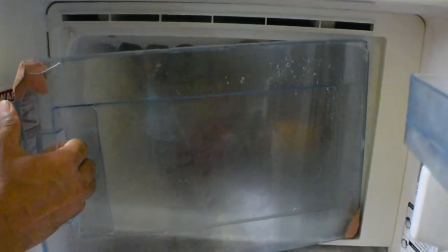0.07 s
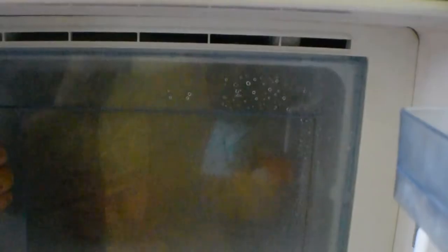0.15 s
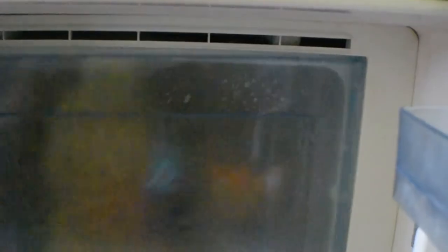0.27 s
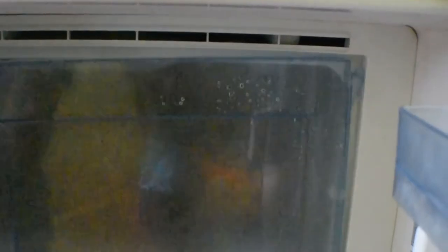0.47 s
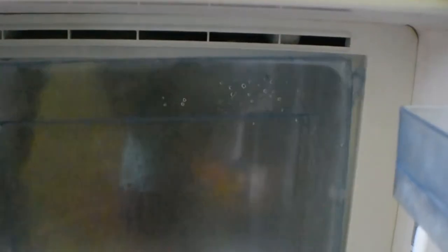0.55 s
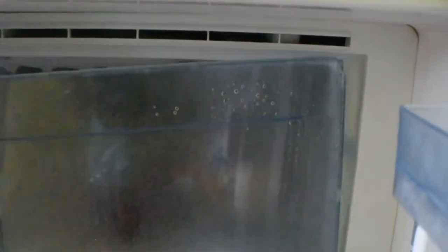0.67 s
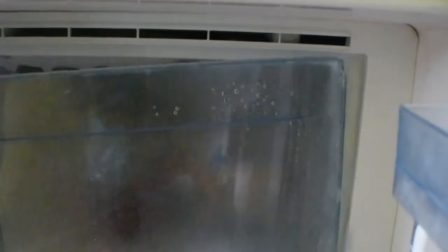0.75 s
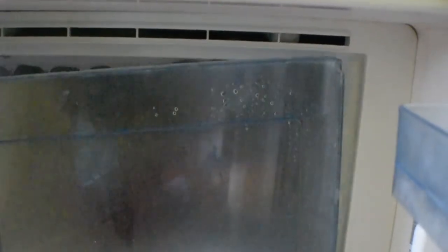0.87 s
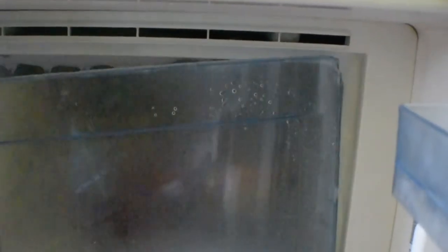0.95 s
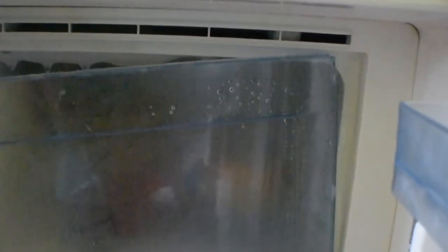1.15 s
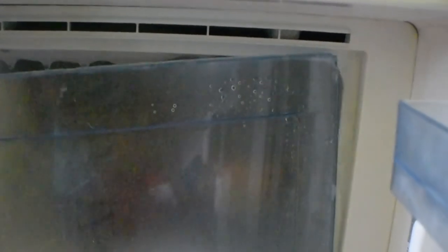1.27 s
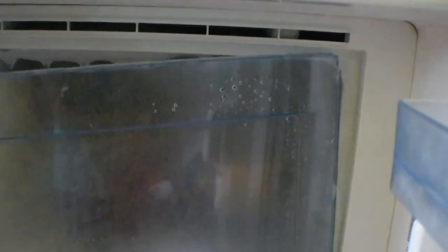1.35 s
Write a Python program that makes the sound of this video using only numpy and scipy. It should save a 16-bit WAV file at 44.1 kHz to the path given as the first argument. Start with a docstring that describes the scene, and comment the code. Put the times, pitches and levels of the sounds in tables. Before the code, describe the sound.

A plastic freezer door slams and rattles, then clicks and gives a bright ping.

```python
"""Freezer door slam and latch.

A spring ping's tail fades under a rubbing noise. A clear plastic freezer door slams against its frame and
chatters, then clicks as it is eased open. The latch snaps free and the hinge gives a bright ping,
probably from its spring. The cabinet and a small kitchen ring on over a faint steady rush; the slam
overloads the close microphone.
"""
import sys
import numpy as np
from scipy import signal
from scipy.fft import rfft, irfft
from scipy.io import wavfile

SR = 44100
rng = np.random.default_rng(int(sys.argv[2]) if len(sys.argv) > 2 else 0)


def write(x):
    x = np.atleast_2d(x).T
    wavfile.write(sys.argv[1], SR, np.round(np.clip(x, -1, 1) * 32767).astype(np.int16))


N = 61739
TIME_S = np.arange(N) / SR
BIN_HZ = np.maximum(np.fft.rfftfreq(N, 1 / SR), 1)
DOOR_LEFT_DB = 0.6


def amp(db):
    """Decibels to gain."""
    return 10 ** (np.asarray(db) / 20)


def curve(points, hz):
    """Interpolate (f/Hz, value) points over log frequency."""
    points_hz, values = np.array(points, float).T
    return np.interp(np.log(hz), np.log(points_hz), values)


def pan(x, left_db):
    """Set the left channel left_db above the right."""
    return x * amp(np.array([[left_db], [-left_db]]) / 2)


def decay(start_s, t60_s, rise_s=0.00041):
    """Envelope: quick rise, exponential fall."""
    age_s = np.maximum(TIME_S - start_s, 0)
    return (1 - np.exp(-age_s / rise_s)) * np.exp(-np.log(1000) * age_s / t60_s)


def ring(start_s, modes, rise_s):
    """Damped sine modes, struck together."""
    age_s = TIME_S - start_s
    return sum(amp(db) * np.sin(2 * np.pi * hz * age_s) * decay(start_s, t60_s, rise_s)
               for hz, db, t60_s in modes)


# Stereo width: f/Hz, side re mid/dB
STEREO_WIDTH = [(150, -44), (1000, -20), (2500, -12.5), (8000, -9), (13000, -4.5)]

def noise(bin_gain):
    """Shaped stereo noise, near mono in the bass."""
    mid, side = rfft(rng.standard_normal((2, N)))
    side = side * amp(curve(STEREO_WIDTH, BIN_HZ))
    return irfft(np.array([mid + side, mid - side]) * bin_gain, N)


def octave_noise(db):
    """Noise of a given level per octave."""
    return noise(amp(db) * np.sqrt(SR / 2 / BIN_HZ / np.log(2)))


def narrow_noise(centre_hz, half_width_hz):
    """Noise in one resonance: a wavering tone, unit RMS."""
    tone = noise(1 / (1 + ((BIN_HZ - centre_hz) / half_width_hz) ** 2))
    return tone / tone.std()


# Kitchen background: f/Hz, octave level/dB
RUSH_SPECTRUM = [(25, -92), (70, -74), (130, -67.5), (280, -60.5), (550, -43.5), (800, -47.5),
                 (1150, -48.5), (1700, -54), (4000, -61), (10500, -66), (12000, -78), (16000, -87)]

def kitchen_rush():
    """Faint steady room noise."""
    return octave_noise(curve(RUSH_SPECTRUM, BIN_HZ))


# Rubbing noise: f/Hz, octave level/dB
RUB_SPECTRUM = [(60, -55), (250, -61), (550, -39.5), (1100, -38.5), (2200, -44.5), (5000, -47.5),
                (9500, -52), (11500, -64), (15500, -66)]
# Fading spring resonances: f/Hz, half-width/Hz, level/dB
SPRING_TAIL = [(3152, 28, -45), (8300, 130, -44), (9820, 39, -56)]

def rub_and_ping_tail(end_s=0.148, release_s=0.0036, split_hz=2000, dull_db_per_s=-34, bright_db_per_s=-73):
    """An earlier spring ping fades under a rubbing noise, treble first, then cuts off abruptly."""
    rub_db = curve(RUB_SPECTRUM, BIN_HZ)
    treble_share = BIN_HZ ** 2 / (BIN_HZ ** 2 + split_hz ** 2)
    dull = octave_noise(rub_db + 10 * np.log10(1 - treble_share))
    bright = octave_noise(rub_db + 10 * np.log10(treble_share))
    bright += sum(amp(db) * narrow_noise(hz, half_width_hz) for hz, half_width_hz, db in SPRING_TAIL)
    gate = np.clip((end_s - TIME_S) / release_s + 1, 0, 1)
    return gate * (dull * amp(dull_db_per_s * TIME_S) + bright * amp(bright_db_per_s * TIME_S))


# Door-frame contacts: t/s, bass/dB, mid/dB, treble/dB, top/dB, t60/s
CONTACTS = [(0.214, -66, -43, -47, -29.5, 0.038), (0.2202, -36, -26, -27.5, -49, 0.086),
            (0.2319, -27, -14, -15, -24.5, 0.072), (0.243, -30, -5.5, -33, -30, 0.04),
            (.2510, -15.5, 0, -16, -13.5, 0.034), (0.255, -9.5, -12, -10.5, -18, 0.038),
            (.2630, -13, -3.5, -6.5, -23, 0.028), (.2790, -20.5, -6, -54, -44, 0.046),
            (.3115, -42, -24, -41, -22.5, 0.024), (0.325, -53, -18, -36, -55, 0.039),
            (.3855, -49, -25, -23, -33, 0.033), (0.4, -46, -27, -15.5, -31, 0.033),
            (0.4035, -47, -17, -10.5, -22.5, 0.043), (.5110, -47, -29.5, -57, -69, 0.065),
            (.5515, -58, -32.5, -47, -68, 0.2), (.5900, -64, -24, -27.5, -35.5, 0.026),
            (.6210, -44, -30, -44.5, -58, 0.11), (0.661, -59, -40, -53, -39, 0.051),
            (.6722, -52, -21.5, -26.5, -34, 0.037), (0.6949, -60, -26, -31, -58, 0.061),
            (0.7042, -53, -39, -25, -44, 0.053), (0.7271, -63, -20.5, -12, -28.5, 0.037),
            (0.946, -60, -37.5, -44, -66, 0.027)]
# Bass, mid, treble, top: f/Hz
CONTACT_BANDS_HZ = [250, 1200, 3500, 9500]
# Plastic colour, added to each contact: f/Hz, level/dB
PLASTIC_COLOUR = [(30, -46), (75, -27), (150, -8.5), (330, -3.5), (600, 0.5), (1000, 0.5), (1900, 1),
                  (5500, -2.5), (9800, -3.5), (11500, -17), (16000, -30)]

def door_clacks():
    """Each contact excites dense, heavily damped plastic modes: a noise burst."""
    plastic_db = curve(PLASTIC_COLOUR, BIN_HZ)
    clacks = 0
    for start_s, *bands_db, t60_s in CONTACTS:
        contact_db = curve(list(zip(CONTACT_BANDS_HZ, bands_db)), BIN_HZ)
        clacks += octave_noise(plastic_db + contact_db) * decay(start_s, t60_s)
    return pan(clacks, DOOR_LEFT_DB)


# Door panel and frame modes: f/Hz, level re contact/dB, t60/s
PANEL_MODES = [(267, -7, 0.26), (462.3, -19, 0.16), (659, -9, 0.29), (695, -17, 0.18), (756.4, -16, 0.37),
               (841, -19, 0.29), (897, -23, 0.2), (984, -19, 0.26), (1118, -36, .25), (1263, -16, 0.29),
               (1340, -16.5, 0.26), (1423, -8, 0.18), (1750, -16, 0.19), (1993, -17, .26),
               (2302, -26, 0.16), (3004, -27, 0.23)]

def panel_ring():
    """Each contact feeds each panel mode with its energy at that pitch."""
    tones = 0
    for hz, db, t60_s in PANEL_MODES:
        blows = np.zeros(N)
        for start_s, *bands_db, _ in CONTACTS:
            contact_db = curve(list(zip(CONTACT_BANDS_HZ, bands_db)), hz)
            blows[int(start_s * SR)] = amp(contact_db) ** 2
        energy = signal.fftconvolve(blows, decay(0, t60_s, rise_s=0.0026) ** 2)[:N]
        carrier = np.sin(2 * np.pi * (hz * TIME_S + rng.random()))
        tones += amp(db) * np.sqrt(np.abs(energy)) * carrier
    return tones


# Cabinet modes: f/Hz, level/dB, t60/s
CABINET_MODES = [(58, -29, 0.073), (84, -31, 0.11), (121.4, -19, 0.126), (172.4, -18.5, 0.131)]

def cabinet_thump():
    """The slam shakes the cabinet's low modes."""
    return ring(start_s=0.2495, modes=CABINET_MODES, rise_s=0.0062)


# Latch modes: f/Hz, level/dB, t60/s
LATCH_MODES = [(1391, -3.5, 0.049), (1610, -7, 0.031), (1625, -23.5, 0.24), (2468, -31, 0.21),
               (3710, -21, .07), (4250, -24, .05), (8330, -39, .25), (9749, -45, 0.15)]

def latch_snap():
    """The latch snaps free and rings."""
    return ring(start_s=0.7255, modes=LATCH_MODES, rise_s=0.0025)


PING_S = 1.1085
# Spring click: f/Hz, octave level/dB
CLICK_SPECTRUM = [(500, -62), (1500, -39.5), (2500, -39.5), (4400, -22), (6800, -38.5), (8600, -15),
                  (11000, -10.5), (15500, -42)]

def spring_click(second_s=1.1155, second_db=-3, t60_s=0.037):
    """The bright double click that sets the spring ringing."""
    snaps = decay(PING_S, t60_s) + amp(second_db) * decay(second_s, t60_s)
    return pan(octave_noise(curve(CLICK_SPECTRUM, BIN_HZ)) * snaps, DOOR_LEFT_DB)


# Hinge spring modes, low and high: f/Hz, level/dB, t60/s
SPRING_LOW_MODES = [(3096, -26, 0.36), (3107, -20, 0.34), (3163, -21, .27), (3170, -30, .5)]
SPRING_HIGH_MODES = [(8078, -22, .37), (8199, -17.5, .21), (8323, -28, .25), (8581, -25, .08),
                     (9781, -27.5, .25)]
# Room-smeared ping: f/Hz, half-width/Hz, level/dB, t60/s
HALO_BANDS = [(3135, 40, -36, .6), (8170, 90, -25, .38), (9790, 60, -38, .42)]

def spring_ping():
    """Close low modes swell late and beat; the room smears the ping into narrow bands."""
    low = ring(PING_S, SPRING_LOW_MODES, rise_s=0.026)
    high = ring(PING_S, SPRING_HIGH_MODES, rise_s=0.0015)
    halo = sum(amp(db) * narrow_noise(hz, half_width_hz) * decay(PING_S, t60_s, rise_s=0.0035)
               for hz, half_width_hz, db, t60_s in HALO_BANDS)
    return low + pan(high + halo, left_db=2.4)


# Kitchen reverberation: f/Hz, t60/s
KITCHEN_DECAY = [(60, 0.17), (140, 0.65), (600, 0.81), (2000, .45), (6000, 0.34), (14000, 0.33)]

def echoes(source, cabinet_db=-3, kitchen_db=-5):
    """Diffuse reflections: band energy dies fast in the cabinet, slowly in the kitchen."""
    centres_hz = np.geomspace(50, 16000, num=15)
    spectrum = rfft(source.mean(axis=0))
    cabinet = decay(0, t60_s=0.09) ** 2
    cabinet *= amp(cabinet_db) ** 2 / cabinet.sum()
    wet = 0
    for hz, one_hot in zip(centres_hz, np.eye(len(centres_hz))):
        band_gain = np.sqrt(np.interp(np.log(BIN_HZ), np.log(centres_hz), one_hot))
        kitchen = decay(0, curve(KITCHEN_DECAY, hz), rise_s=0.0052) ** 2
        kitchen *= amp(kitchen_db) ** 2 / kitchen.sum()
        band = irfft(spectrum * band_gain, N)
        energy = signal.fftconvolve(band ** 2, cabinet + kitchen)[:N]
        field = noise(band_gain)
        wet += np.sqrt(np.abs(energy)) * field / field.mean(axis=0).std()
    return pan(wet, DOOR_LEFT_DB)


def scene(click_send_db=3):
    """Sum of all sources; only the clacks and the spring click feed the echoes."""
    clacks = door_clacks()
    body = panel_ring() + cabinet_thump() + latch_snap()
    click = spring_click()
    ping = spring_ping()
    room = echoes(clacks + amp(click_send_db) * click)
    return kitchen_rush() + rub_and_ping_tail() + clacks + body + click + ping + room


def record(dry, ceiling=1.3, knee=8, cutoff_hz=15900):
    """Microphone overload: soft clip, then a steep low-pass."""
    clipped = dry / (1 + np.abs(dry / ceiling) ** knee) ** (1 / knee)
    lowpass = signal.ellip(8, 0.2, 80, cutoff_hz, fs=SR, output="sos")
    return signal.sosfilt(lowpass, clipped)


dry = scene()
out = record(dry)
write(out)
```